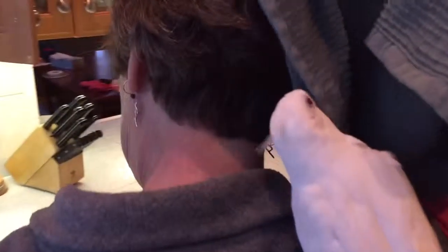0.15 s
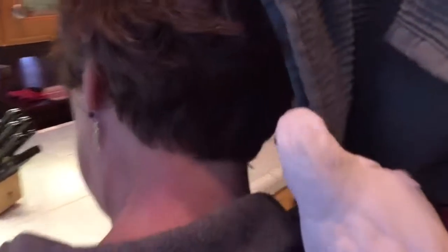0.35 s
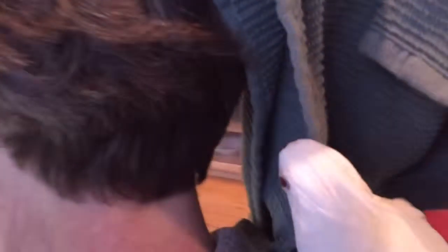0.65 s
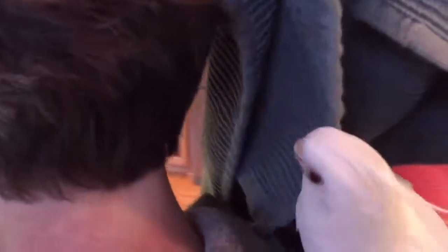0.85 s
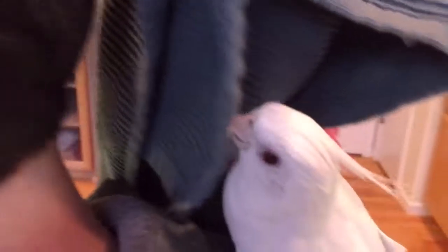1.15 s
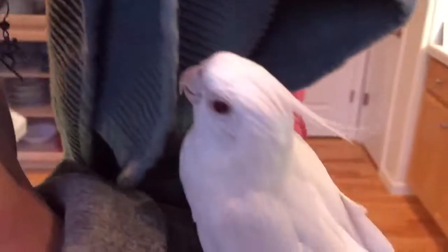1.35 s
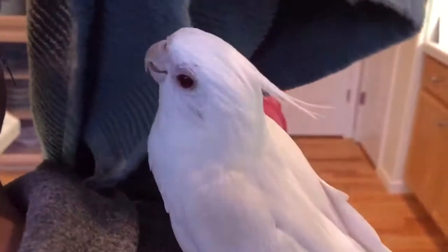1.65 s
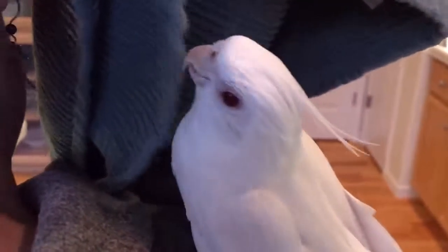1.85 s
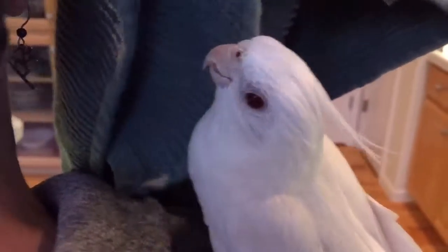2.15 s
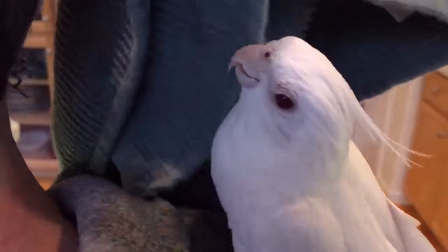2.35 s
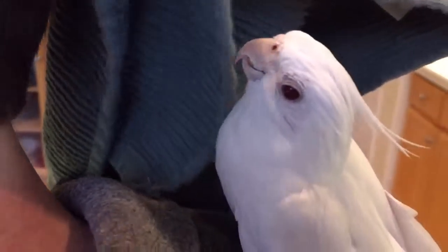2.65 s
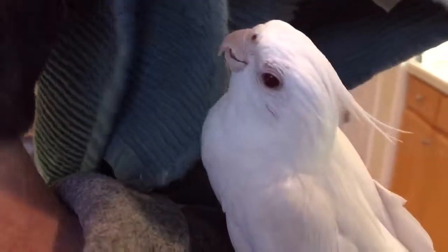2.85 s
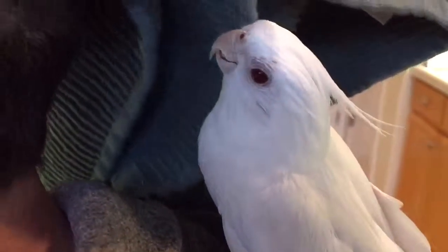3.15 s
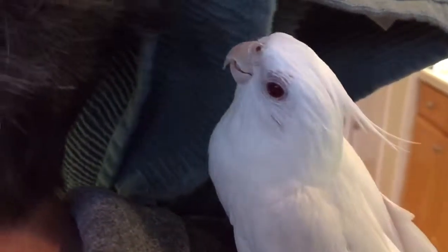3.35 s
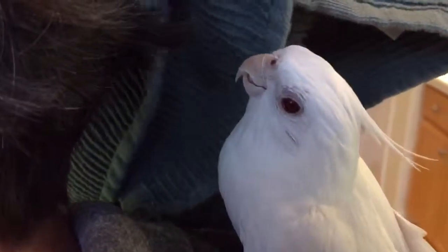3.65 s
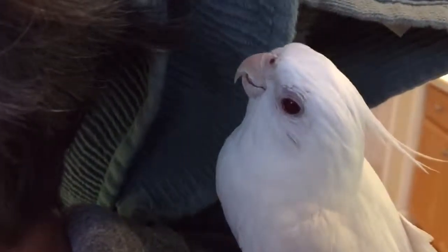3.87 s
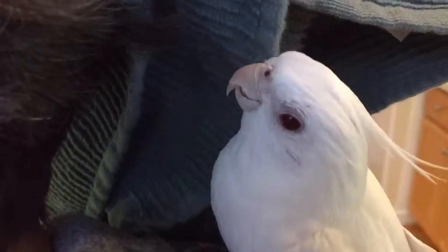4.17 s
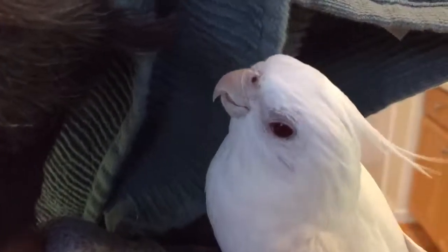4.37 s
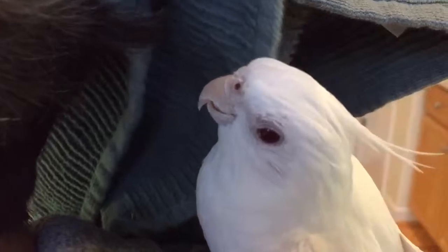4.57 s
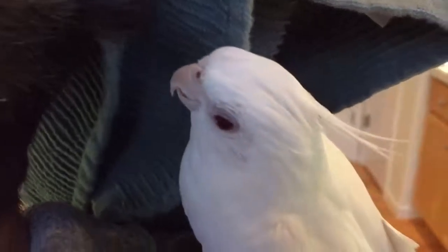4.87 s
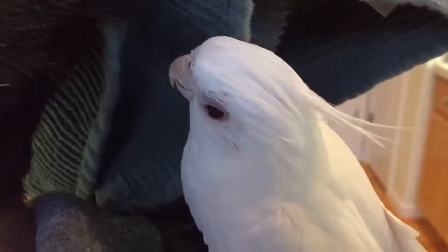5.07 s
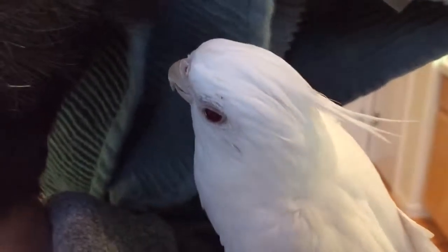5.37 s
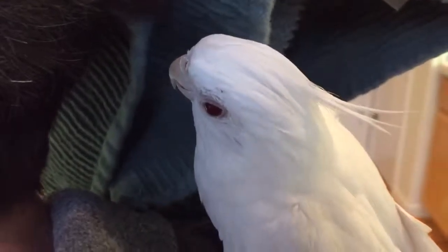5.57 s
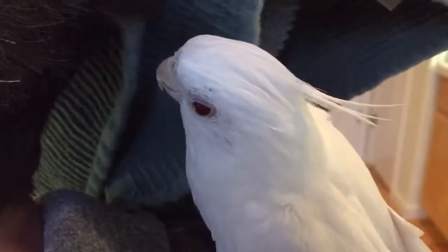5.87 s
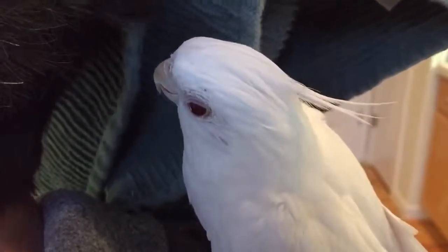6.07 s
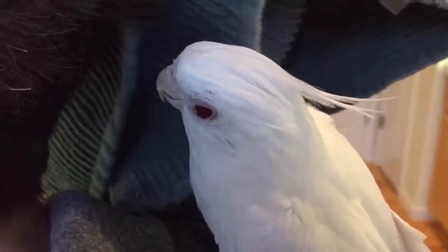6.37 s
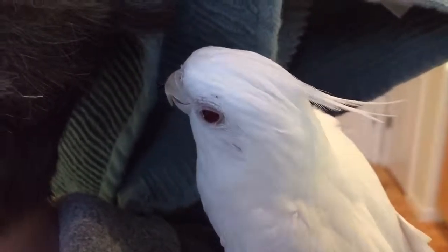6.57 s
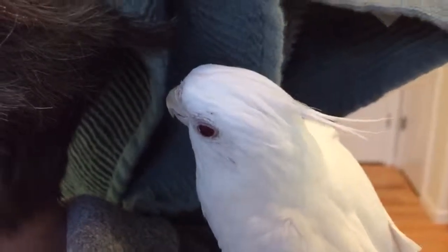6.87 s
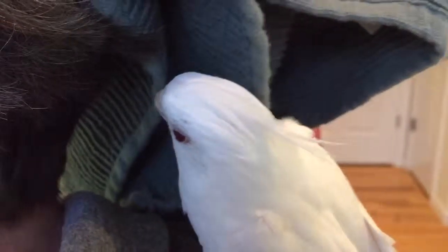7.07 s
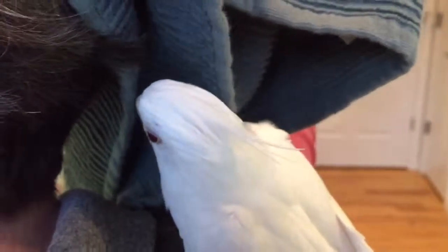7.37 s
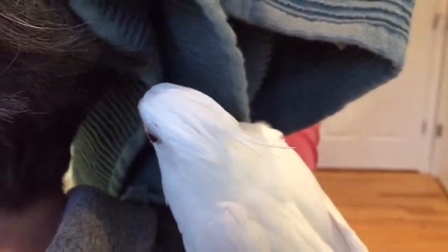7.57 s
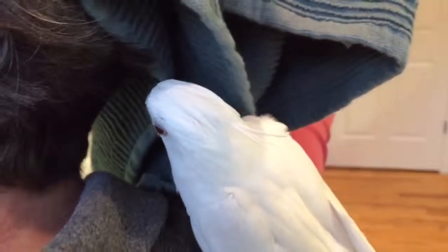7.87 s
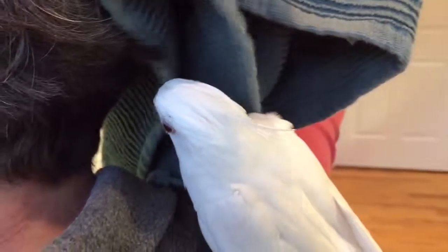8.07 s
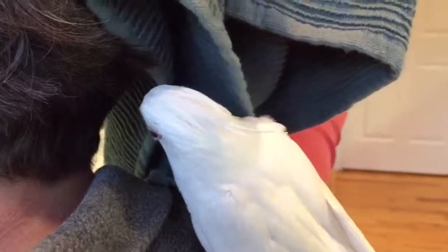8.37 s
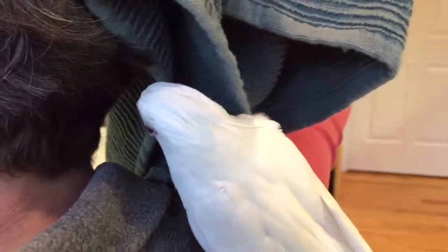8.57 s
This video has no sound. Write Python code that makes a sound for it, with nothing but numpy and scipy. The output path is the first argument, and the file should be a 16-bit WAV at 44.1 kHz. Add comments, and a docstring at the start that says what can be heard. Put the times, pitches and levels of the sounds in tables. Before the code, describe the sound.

Quiet kitchen with light reverberation, heard through a close handheld microphone. Slight knocks and a short brush of fabric come first, with a few dull, low thuds. Then a pet cockatiel utters the same brief, high chirp over and over, each opening with a rasp, clearing into a fast-fluttering whistle and breaking up. The spacing steadily widens and the tone cleans up, until the last chirp roughens slightly.

```python
"""A cockatiel on a shoulder, close to the microphone, repeats one short chirp, ever more slowly, in a quiet kitchen.
Each chirp is a frequency-modulated tone with overtones, shaped by throat and beak: it opens with a rasp,
clears into a fast-trilled whistle near 2.2 kHz and breaks up again; echoes and a diffuse tail follow it.
Early on the microphone is moved: noise-struck resonances knock and filtered noise brushes as cloth; decaying
sines thud softly, now and then. Room air, an appliance hum and a faint rumble of the hand lie beneath."""
import sys
import numpy as np
from scipy import signal
from scipy.fft import rfft, irfft, next_fast_len
from scipy.io import wavfile
from scipy.ndimage import map_coordinates

SR = 44100
rng = np.random.default_rng(int(sys.argv[2]) if len(sys.argv) > 2 else 0)


def output_pcm(signal):
    """Save a mono or channel-first signal as 16-bit PCM at the path in sys.argv[1].

    Samples are clipped to [-1, 1] before scaling.
    """
    pcm = np.clip(np.atleast_2d(signal).T, -1, 1) * 32767
    wavfile.write(sys.argv[1], SR, np.round(pcm).astype(np.int16))


N = 384552  # samples
LEAD = SR // 4  # samples of sound before time zero

# The chirps of the bird. Each row: start in seconds, opening rasp in seconds, whistle in seconds,
# whole length in seconds, level in dB, overtones in dB against the fundamental, nominal pitch in Hz,
# lift of the ends in Hz, nominal trill depth in Hz, trill rate at the first crest in Hz, roughness from 0 to 1.
BIRD_CHIRPS = [ (-.11, 0.046, 0.11, 0.15, -18, -30, 2146, 30, 125, 89, 0.13),
               (1.264, .0375, .075, 0.16, -23, -13, 1991, 330, 180, 88, 0.3),
               (1.565, .033, .042, 0.14, -22.5, -15.5, 2027, 200, 190, 81, 0.32),
               (1.864, .037, 0.032, 0.15, -22.5, -14, 2072, 390, 191, 93, 0.49),
               (2.153, .02, .072, 0.15, -21, -15, 2110, 600, 182, 89, 0.65),
               (2.461, .0217, .045, .14, -19.5, -16, 2198, 530, 183, 84, 0.62),
               (2.767, .0232, .042, 0.13, -20, -14.5, 2150, 610, 170, 78, 0.63),
               (3.075, .0267, 0.064, 0.15, -20.5, -13.5, 2186, 520, 201, 86, 0.54),
               (3.396, .0227, .052, 0.14, -20.5, -15.5, 2146, 380, 186, 88, 0.46),
               (3.716, .0265, 0.037, 0.14, -21, -15.5, 2141, 220, 206, 79.4, 0.39),
               (4.054, .032, .062, 0.15, -19.5, -16.5, 2134, 290, 197, 84, .33),
               (4.44, .033, .044, 0.15, -19, -15.5, 2191, 200, 207, 91.5, 0.29),
               (4.879, .031, .06, 0.16, -19.5, -15, 2189, 200, 180, 84, 0.21),
               (5.34, .0345, .0705, 0.15, -19.5, -15.5, 2186, 70, 145, 87, .1),
               (5.816, .0304, .0826, 0.15, -19, -15.5, 2190, 80, 139, 86, 0.09),
               (6.3, .0297, .064, 0.14, -19, -15.5, 2216, 30, 117, 89, .05),
               (6.771, .0336, .0795, 0.16, -18.5, -17, 2200, 30, 141, 93, 0),
               (7.281, .034, .06, 0.13, -19, -17.5, 2141, 60, 138, 77, 0.04),
               (7.792, .0334, .03, 0.14, -20.5, -14.5, 2366, 99.8, 392, 83, .25),
               (8.374, .0434, 0.045, 0.17, -21, -17.5, 2170, 580, 183, 88, .12)]


def cockatiel():
    """Repetition: one vocal gesture recurs with its own timing, pitch and roughness each time."""
    track = np.zeros(LEAD + N)
    for start, *shape in BIRD_CHIRPS:
        add(track, start, chirp(shape))
    return track


def chirp(shape):
    """Source and filter: a trilled tone of the syrinx passes through throat and beak."""
    crest, whistle_s, length_s, db, overtone_db, pitch_hz, lift_hz, depth_hz, trill_rate, rough = shape
    t = np.arange(0, length_s, 1 / SR)
    swell_db, bright_db = effort(t, crest, rough)
    course = gesture(t, crest, crest + whistle_s, trill_rate, rough)
    trill, edge, choke, split, rasp = course
    hz = pitch(t, crest, whistle_s, pitch_hz, lift_hz, depth_hz, rough, course)
    trill_db = min(depth_hz / 190, 1) ** 2 * (3 * trill - 6 * choke)
    tone, buzz = syrinx(hz, trill_db, trill, split, rasp, rough)
    voice = throat_and_beak(tone, buzz, overtone_db + bright_db, rough)
    return voice * amp(db + swell_db) * ramp(t / 0.0033) * ramp((t[-1] - t) / 0.011)


# A rough chirp is forced: it starts harder and holds longer. FORCED values are added at full roughness.
ONSET_DB, FORCED_ONSET_DB = -20, 13.5  # first moment against the peak
FADE_DB, FORCED_FADE_DB = -18, 14.5  # last moment against the peak
SWELL_POWER, FADE_POWER = 1.075, 2.19  # curvature of the rise and of the fall
BRIGHT_ONSET_DB = 5  # extra overtones at the first moment, gone when the whistle begins
DULL_END_DB, DULL_END_S = -9.5, .028  # the overtones weaken ahead of the tone


def effort(t, crest, rough):
    """Amplitude envelope: swell to the first trill crest, then fade, with the overtones' own dB beside it."""
    to_come = ramp((crest - t) / (crest - t[0]))
    spent = ramp((t - crest) / (t[-1] - crest))
    swell_db = (ONSET_DB + FORCED_ONSET_DB * rough) * to_come ** SWELL_POWER
    fade_db = (FADE_DB + FORCED_FADE_DB * rough) * spent ** FADE_POWER
    bright_db = BRIGHT_ONSET_DB * to_come + DULL_END_DB * ramp(1 - (t[-1] - t) / DULL_END_S)
    return swell_db + fade_db, bright_db


TRILL_SLOWS_PER_S = .8  # share of its rate that the trill loses in a second


def gesture(t, crest, end, trill_rate, rough, relapse=0.43):
    """Modulation and bifurcation: trill swing, and shares of end tone, choking, period doubling and rasp."""
    since = t - crest
    cycle = 2 * np.pi * trill_rate * since * (1 - TRILL_SLOWS_PER_S * since / 2)
    opening, closing = ramp((crest - .002 - t) / 0.0015), ramp((t - end) / 0.0002)
    # toward both ends the trill dies and the tone settles on a higher note
    edge = ramp((crest - .004 - t) / 0.01386) + ramp((t - end - .012) / 0.041)
    # each trill climbs slowly, drops fast and weakens the tone in its trough
    trill = 1.237 * np.cos(cycle - 0.21 * np.cos(cycle)) * (1 - 0.99 * edge) * np.exp(-since / 0.54)
    choke = ramp(3 * (np.cos(cycle + 3) - .65)) * (1 - edge)
    # just after a trough the membranes may slip into period doubling, least often mid-whistle
    fragile = ramp(7.0 * (np.cos(cycle + 2) - .45))
    steady = np.sin(np.pi * ramp(since / (end - crest)))
    chance = .6 * wobble(85, len(t))
    slips = ramp(3.6 * rough - .9 - .8 * steady + chance + opening + 1.1 * closing)
    split = fragile * slips * (1 - 0.56 * edge)
    # the rasp lies between the whistle and the cleaner first and last moments
    inner = ramp(0.12 + (t - t[0]) / 0.015) * ramp((t[-1] - .012 - t) / 0.013)
    breakup = relapse * fragile + (0.44 + 1.1 * rough) * ramp((t - end) / 0.024)
    rasp = inner * ramp(opening + closing * breakup + .3 * rough)
    return trill, edge, choke, split, rasp


ARCH_HZ, FORCED_ARCH_HZ = 25.2, -91  # the middle of the whistle bends up, or down when forced


def pitch(t, crest, whistle_s, pitch_hz, lift_hz, depth_hz, rough, course, sag_hz_per_s=950,
          jitter_hz=22, rasp_jitter_hz=170, split_jitter_hz=90):
    """Frequency modulation: a sagging pitch carries the trill, lifted ends, a bend and random jitter."""
    trill, edge, _, split, rasp = course
    hz = pitch_hz - sag_hz_per_s * (t - crest) + depth_hz * trill
    hz += lift_hz * (edge + 0.32 * rasp * (1 - edge))
    arch_hz = ARCH_HZ + FORCED_ARCH_HZ * rough
    hz -= arch_hz * np.cos(2 * np.pi * ramp((t - crest) / whistle_s))
    hz += (jitter_hz + split_jitter_hz * split) * wobble(800, len(t))
    hz += (rasp_jitter_hz * rasp + 45 * edge) * wobble(380, len(t))
    return hz


def syrinx(hz, trill_db, trill, split, rasp, rough, flutter_hz=900, flutter_spread_hz=240,
           swing=0.73, throb=.45, under_db=-7.5, over_db=3):
    """Nonlinear oscillation: side bands, period doubling and loosened overtones roughen the tone."""
    size = len(hz)
    # in the rasp an uneven flutter throws side bands around every partial
    flutter = np.sin(2 * np.pi * np.cumsum(flutter_hz + flutter_spread_hz * wobble(900, size)) / SR)
    phase = 2 * np.pi * np.cumsum(hz) / SR + swing * rasp * flutter
    push_db = (1.3 + 1.5 * rasp) * np.tanh(wobble(220, size)) - 1.2 * rasp
    push = (1 + rasp * throb * flutter) * amp(push_db)
    # period doubling moves energy to one half and three halves of the pitch
    halves = amp(under_db) * np.sin(phase / 2)
    halves += amp(over_db + 10 * (rough - .5)) * np.sin(phase + phase / 2)
    whole = (1 - 0.68 * split) * (1 + 0.64 * rasp * wobble(1800, size)) * np.sin(phase)
    tone = push * amp(trill_db) * (whole + split * halves)
    # the overtones lose their step with each other as the tone roughens
    scatter = .05 + .32 * rough + .3 * rasp
    buzz = sum(np.sin(k * (phase + scatter * wobble(1200, size))) for k in np.arange(2, 8))
    buzz = buzz * (1 + 0.52 * split * np.sin(phase / 2)) + 0.066 * rng.standard_normal(size)  # with breath noise
    buzz_db = .5 * trill_db + 1.2 * trill + 1.6 * np.tanh(wobble(400, size))
    return tone, push * amp(buzz_db) * buzz


BODY_DB, FORCED_BODY_DB = 3, -24  # level of the low side bands; added with roughness squared
BODY_DROP_DB = 3.5  # a clear chirp loses its very lowest side bands
SHEEN_DB, FORCED_SHEEN_DB = 2, -6  # level of the highest overtones; added at full roughness
# Throat and beak as they pass the fundamental. Each row: frequency in Hz, gain in dB.
FUNDAMENTAL_TRACT = [(300, -51.5), (500, -14), (750, -7), (1000, -2), (1550, 0.5), (1850, 3.5), (2050, 2.5),
                     (2320, -2), (2600, 3), (3150, 1), (3700, -13.5), (5200, -5), (8000, -51)]
# Throat and beak as they pass the overtones. Each row: frequency in Hz, gain in dB.
OVERTONE_TRACT = [(2000, -31.5), (3600, 0.5), (4200, 2), (4700, -1), (5100, 2.5), (5450, -0.5), (6100, -9),
                  (7000, -9), (7700, -22), (9300, -23.5), (10200, -42.5), (11100, -37.5), (12300, -15),
                  (13300, -11.5), (16000, -27.5)]


def throat_and_beak(tone, buzz, overtone_db, rough):
    """Resonant filtering: the tract weights the partials, and the gape of the beak thins or fills both extremes."""
    body_db = BODY_DB + FORCED_BODY_DB * rough ** 2
    lowest_db = body_db - BODY_DROP_DB * (1 - rough)
    sheen_db = SHEEN_DB + FORCED_SHEEN_DB * rough
    gape = [(500, lowest_db), (1100, body_db), (1900, 0), (6800, 0.022), (8000, sheen_db)]  # (Hz, dB)
    fundamental = coloured(tone, FUNDAMENTAL_TRACT)
    overtones = coloured(buzz, OVERTONE_TRACT)
    return filtered(fundamental + amp(overtone_db) * overtones, lambda hz: amp(along(gape, hz)))


def handling():
    """Superposition: knocks, thuds of the hand and sliding cloth add together."""
    track = np.zeros(LEAD + N)
    knocks(track)
    thuds(track)
    cloth(track)
    return track


# Resonances that the knocks ring. Each row: frequency in Hz, width in Hz, gain in dB.
CASE_MODES = [(349, 33, -2.5), (774, 220, -2.5), (1290, 1750, -9), (2760, 1800, -12.5)]
# Soft knocks. Each row: start in seconds, relative level in dB, contact bandwidth in Hz.
SOFT_KNOCKS = [(0.289, -42.5, 2560), (0.48, -48, 957), (.672, -61.5, 2630)]


def knocks(track, knock_t60=0.032, rattle_t60=0.4, rattle_db=-11):
    """Modal excitation: a decaying noise contact with a weaker, longer rattle drives a few resonances."""
    t = np.arange(SR // 3) / SR

    def case(hz):
        response = 0
        for k, (centre, width, db) in enumerate(CASE_MODES):
            mode = 1j * hz * width / (centre * centre - hz * hz + 1j * hz * width)
            response = response + (-1) ** k * amp(db) * mode  # neighbours in opposite sign
        return response

    envelope = amp(-60 * t / knock_t60) + amp(rattle_db - 60 * t / rattle_t60)
    for s, db, contact_hz in SOFT_KNOCKS:
        contact = rng.standard_normal(len(t)) * envelope

        def struck(hz):
            # a softer contact excites only the lower resonances
            ratio = hz / contact_hz
            return case(hz) / (1 + 1j * ratio - ratio ** 2)

        add(track, s, amp(db + 20.5) * filtered(contact, struck))


# Soft thuds of the hand. Each row: start in seconds, frequency in Hz, level in dB before the envelope.
HAND_THUDS = [(0.504, 101.2, -43), (1.256, 147, -38), (3.656, 112.6, -47)]


def thuds(track, t60=0.062, rise_s=0.0057):
    """Damped oscillation: each low sine rises smoothly and decays exponentially."""
    t = np.arange(SR // 3) / SR
    envelope = amp(-60 * t / t60) * (1 - np.exp(-t / rise_s))
    for s, hz, db in HAND_THUDS:
        add(track, s, amp(db) * np.sin(2 * np.pi * hz * t) * envelope)


# Swell of the cloth brush. Each row: time in seconds, level in dB.
BRUSH_SWELL = [(0.28, -80), (0.29, -62), (0.354, -56.5), (0.414, -61.5), (0.5, -77)]
# Spectrum of the cloth. Each row: frequency in Hz, relative level in dB per Hz.
CLOTH_SPECTRUM = [(1760, -0.5), (3000, -3.5), (4030, -5.5), (6300, 3), (10600, -4.5), (13200, -3),
                  (16000, -16.5)]


def cloth(track):
    """Friction noise: coloured noise swells and fades unevenly as cloth slides past."""
    s, db = np.transpose(BRUSH_SWELL)
    t = np.arange(s[0], s[-1], 1 / SR)
    swell = amp(np.interp(t, s, db) + wobble(150, len(t)))
    add(track, s[0], swell * coloured(rng.standard_normal(len(t)), CLOTH_SPECTRUM))


# Echoes of near surfaces. Each row: delay in seconds, level in dB.
NEAR_ECHOES = [(.00343, -32.5), (.0056, -29), (.0093, -22)]
# Diffuse tail of the kitchen. Each row: frequency in Hz, 60 dB decay time in seconds, relative level in dB.
KITCHEN_TAIL = [(200, .4, -1.5), (990, 0.39, -6), (1540, 0.44, -2.5), (2050, 0.6, -1.5), (2600, 0.32, 4.5),
                (2830, 0.48, 0.5), (3180, 0.33, -5), (5230, 0.35, -5.5), (7900, 0.1, -7.5),
                (15000, .14, -17.5)]


def kitchen(x, room_db=-10.5, build_up_s=0.004):
    """Reverberation: echoes from near surfaces, then a diffuse tail that rings longest near 2 kHz."""
    hz, t, noise = signal.stft(rng.standard_normal(SR), SR, nperseg=256)
    points_hz, t60, tail_db = np.transpose(KITCHEN_TAIL)
    t60 = np.interp(hz, points_hz, t60)[:, None]
    tail_db = np.interp(hz, points_hz, tail_db)[:, None]
    decay = amp(tail_db - 60 * t / t60) * (1 - np.exp(-t / build_up_s))
    tail = signal.istft(noise * decay, SR, nperseg=256)[1] / np.sqrt(SR / 20)

    def reflections(f):
        return sum(amp(db) * np.exp(-2j * np.pi * f * delay) for delay, db in NEAR_ECHOES)

    return x + filtered(x, reflections) + amp(room_db) * signal.fftconvolve(x, tail)[:len(x)]


def background():
    """Superposition: the hum, the room air and the rumble of the hand add together."""
    return hum() + air() + rumble()


# Partials of an appliance. Each row: frequency in Hz, relative level in dB.
APPLIANCE_HUM = [(199, -76), (240, -73.5), (360, -95)]


def hum():
    """Phase modulation: steady partials of an appliance waver slowly in phase."""
    t = np.arange(N) / SR
    return sum(amp(db + 1.5) * np.sin(2 * np.pi * hz * t + .9 * wobble(16, N)) for hz, db in APPLIANCE_HUM)


# Spectrum of the room air before its low cut. Each row: frequency in Hz, relative level in dB per Hz.
AIR_SPECTRUM = [(15, -45), (25, -24.5), (55, -13.5), (97, -13), (242, -3), (309, -12.5), (463, -17),
                (734, -21), (1160, -24.5), (1370, -24), (2840, -24.5), (3520, -27.5), (5000, -30.5),
                (14800, -40), (16000, -52)]


def air(level_db=-67, low_cut_hz=70):
    """Stationary noise: quiet room air with its lowest part rolled off."""
    noise = coloured(rng.standard_normal(N), AIR_SPECTRUM)
    return filtered(noise, lambda hz: amp(level_db) * hz / np.hypot(hz, low_cut_hz))


# Rumble of the unsteady grip on the microphone. Each row: frequency in Hz, relative level in dB per Hz.
RUMBLE_SPECTRUM = [(20, -32), (55, -0.5), (110, -3), (200, -9), (400, -32.5), (900, -120)]


def rumble():
    """Amplitude modulation: low noise of the unsteady hand comes in faint lumps."""
    level_db = -77.0 + 7.5 * np.tanh(0.77 * wobble(8.7, N))
    return amp(level_db) * coloured(rng.standard_normal(N), RUMBLE_SPECTRUM)


def amp(db):
    """Logarithmic level: decibels to gain."""
    return 10 ** (np.asarray(db) / 20)


def unit(x):
    """Normalization: scale to rms 1."""
    return x / np.sqrt(np.mean(x ** 2) + 1e-20)


def ramp(u):
    """Saturation: hold between 0 and 1."""
    return np.clip(u, 0, 1)


def along(points, hz):
    """Interpolation: read (Hz, value) points on a log frequency axis."""
    f, v = np.transpose(points)
    return np.interp(np.log(hz + 1), np.log(f), v)


def filtered(x, response):
    """Linear filtering: multiply the spectrum by a response of frequency."""
    size = next_fast_len(len(x) + 4096)
    return irfft(rfft(x, size) * response(np.fft.rfftfreq(size, 1 / SR)), size)[:len(x)]


def coloured(x, points):
    """Spectral shaping: x through a (Hz, dB) curve, at rms 1."""
    return unit(filtered(x, lambda hz: amp(along(points, hz))))


def wobble(rate, size):
    """Random modulation: a smooth curve through random knots, rate of them a second."""
    knots = rng.standard_normal(size // 4)
    return map_coordinates(knots, [np.arange(size) * rate / SR], mode="wrap")


def add(track, s, sound):
    """Superposition: mix a sound in at time s in seconds."""
    place = track[LEAD + round(s * SR):][:len(sound)]
    place += sound[:len(place)]


def scene():
    """Superposition: bird and handling ring in the kitchen, over its background."""
    return (kitchen(cockatiel() + handling())[LEAD:] + background())[None]


def record(dry, top_hz=15900, fade_s=.003):
    """Band limiting: the sound fades in at once and keeps nothing above the top frequency."""
    fade_in = ramp(np.arange(N) / SR / fade_s)
    return np.array([filtered(channel * fade_in, lambda hz: hz < top_hz) for channel in dry])


dry = scene()
out = record(dry)
output_pcm(out)
```